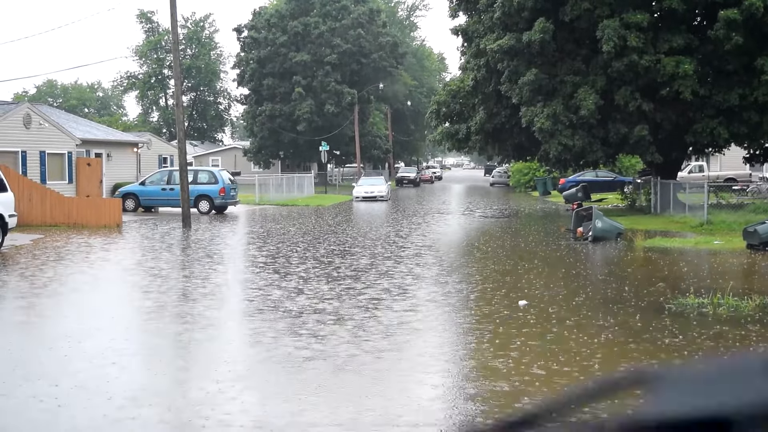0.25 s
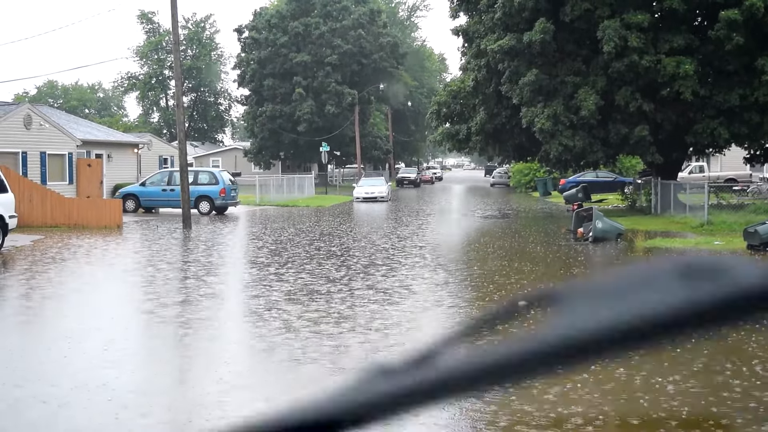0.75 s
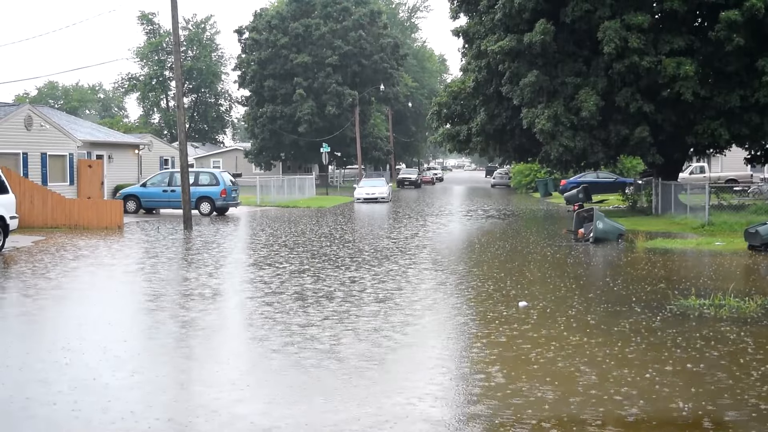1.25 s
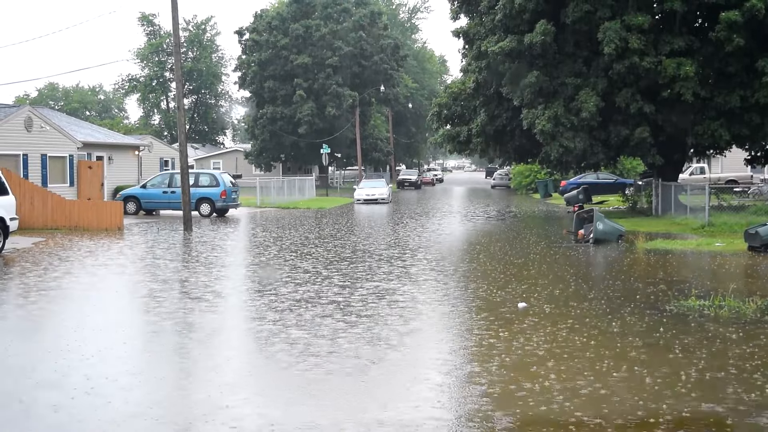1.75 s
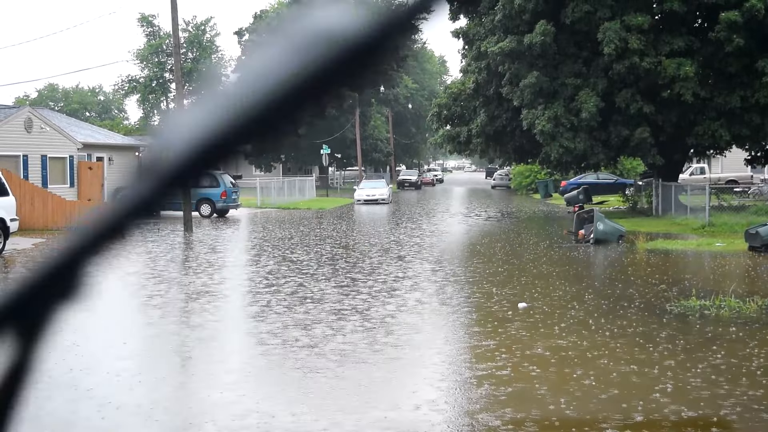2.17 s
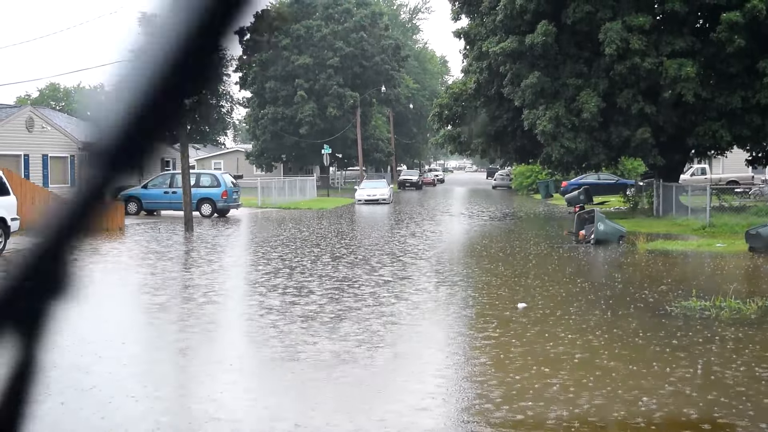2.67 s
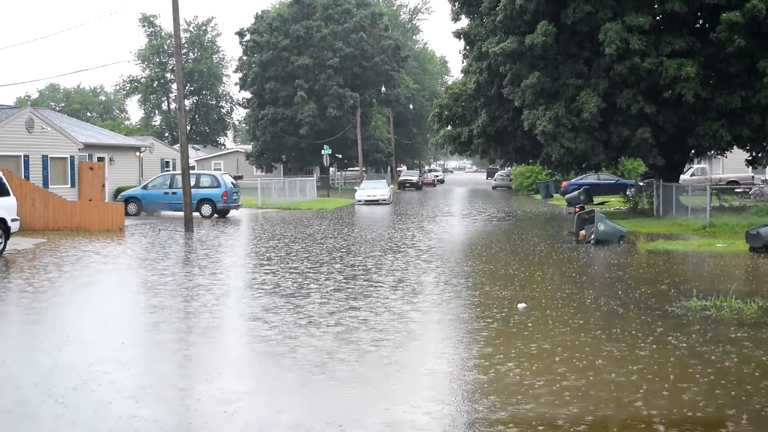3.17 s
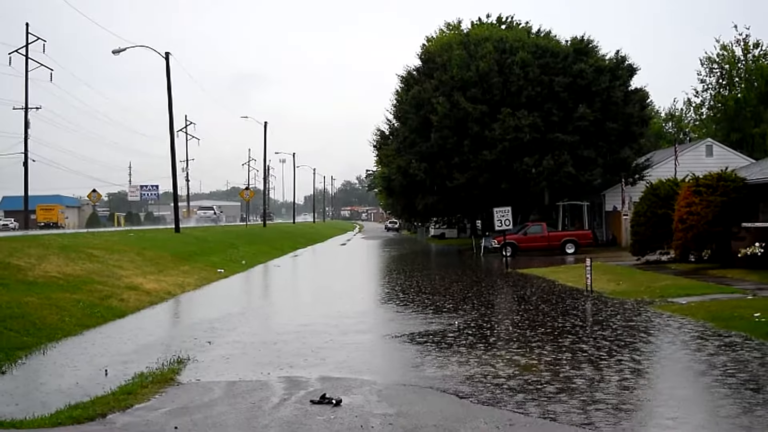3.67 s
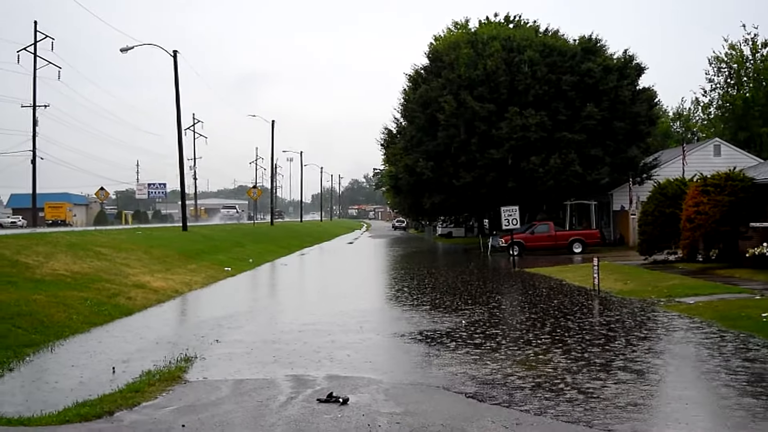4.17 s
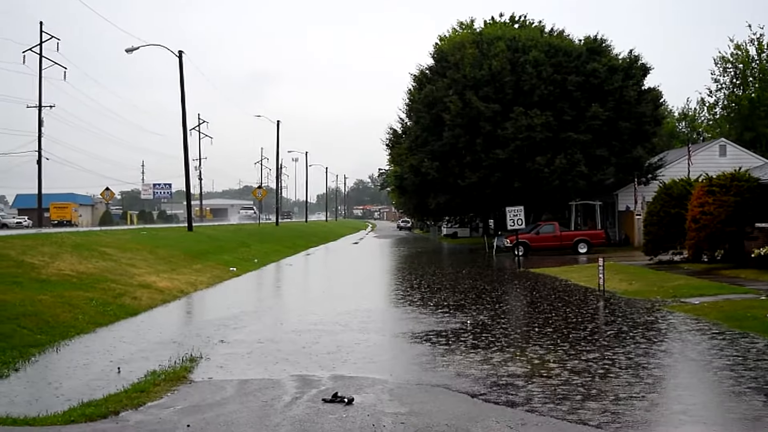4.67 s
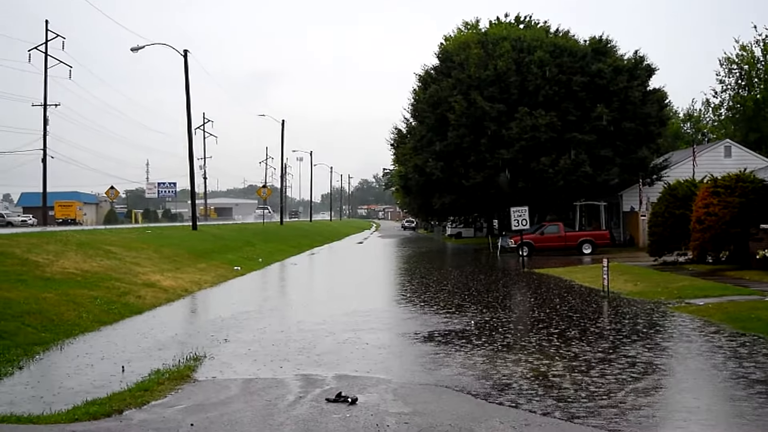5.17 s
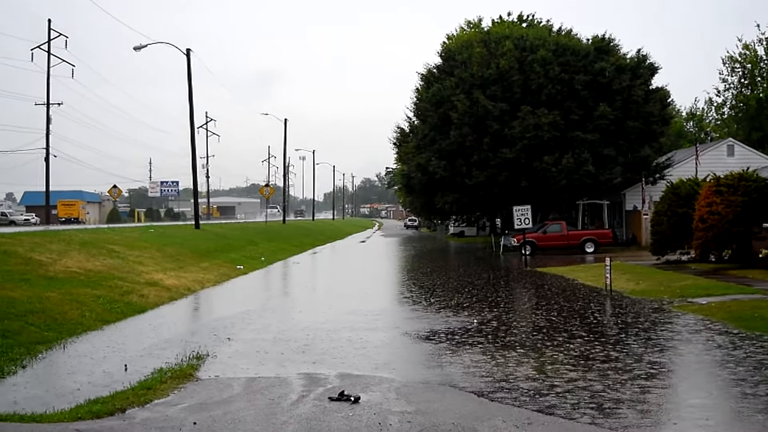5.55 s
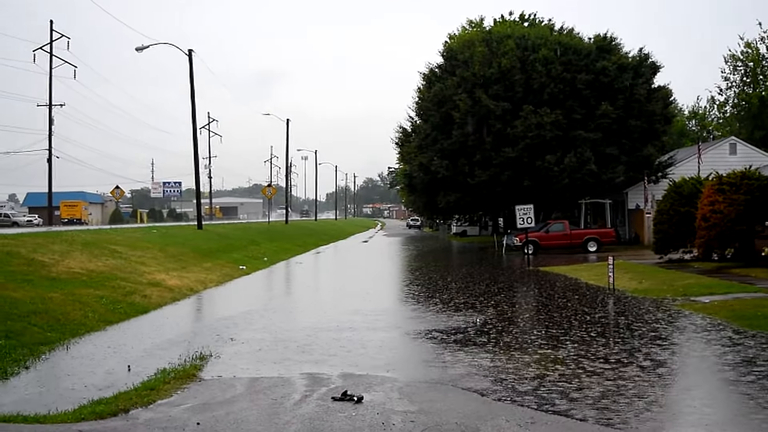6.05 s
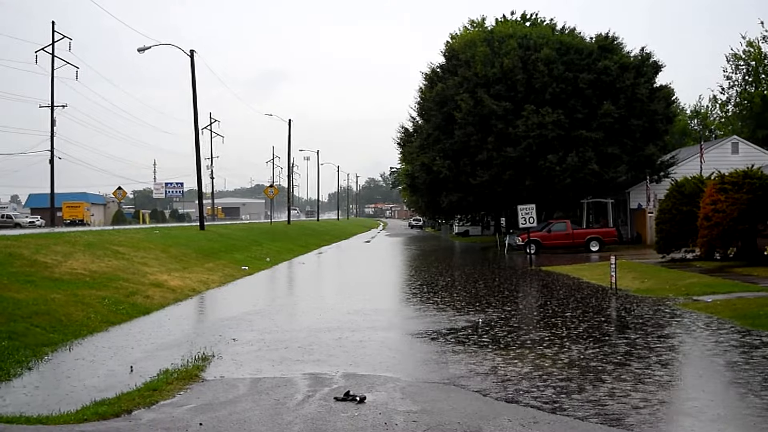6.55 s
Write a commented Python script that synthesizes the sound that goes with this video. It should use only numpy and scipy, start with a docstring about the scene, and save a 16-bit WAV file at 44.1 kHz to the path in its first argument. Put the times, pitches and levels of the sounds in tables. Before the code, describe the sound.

Windshield wipers knock back and forth in a steady rhythm, heard close from inside a car, with a thin motor whine, scattered raindrop ticks and a low idling hum. The sound cuts off for a moment. Then, as if through an open window at the roadside, a truck passes with a louder, uneven engine drone and the hiss of wet tyres. Its note falls and weakens as it slows down.

```python
"""Rain on an idling car, heard from inside: a low hum, drops ringing the roof and glass, and wipers
whose motor whines through each stroke and whose arms thud against the cowl at each turn.
After a short silence the car waits at a wet road, window open. A truck drones past and slows:
its eight cylinders fire unevenly through a resonant tailpipe, and its tyres hiss through the water."""
import sys
import numpy as np
from scipy import signal
from scipy.io import wavfile
from scipy.ndimage import uniform_filter1d

SR = 44100
rng = np.random.default_rng(int(sys.argv[2]) if len(sys.argv) > 2 else 0)


def generate_wav(signal):
    """Clip the signal to [-1, 1] and save it as 16-bit WAV at the path in sys.argv[1]."""
    frames = np.transpose(np.atleast_2d(signal))
    scaled = np.clip(frames, -1, 1) * 32767
    pcm = np.round(scaled).astype(np.int16)
    wavfile.write(sys.argv[1], SR, pcm)


N = 300310
T = np.arange(N) / SR
CABIN_END_S, ROADSIDE_START_S = 3.068, 3.312


def gain(db):
    """Decibels to amplitude."""
    return 10 ** (np.asarray(db) / 20)


def unit_rms(x):
    """Scales to rms 1."""
    return x / np.sqrt(np.mean(x ** 2) + 1e-20)


def curves(rows):
    """One per-sample curve for each column after the time."""
    times, *columns = np.transpose(rows)
    return [np.interp(T, times, column) for column in columns]


def wander(top_hz):
    """Random drift over the decade below top_hz, rms 1."""
    hz, phase = np.geomspace(top_hz / 10, top_hz, 12), rng.random(12)
    coarse = T[::128]
    drift = np.sin(2 * np.pi * (hz * coarse[:, None] + phase)).sum(1)
    return np.interp(T, coarse, unit_rms(drift))


def wash(spectrum, patchy_db, flicker_db, size=1024):
    """Noise shaped by (f/Hz, level/dB) rows, with drifting patches and broadband flicker; rms 1."""
    hop = size // 4
    hz = np.fft.rfftfreq(size, 1 / SR)
    real, imag, patches = rng.standard_normal((N // hop + 5, len(hz), 3)).T
    patches = unit_rms(uniform_filter1d(uniform_filter1d(patches, 10, 0), 10, 1))
    knot_hz, knot_db = np.transpose(spectrum)
    colour_db = np.interp(np.log(hz + 1), np.log(knot_hz + 1), knot_db, left=-99, right=-99)
    flicker = rng.standard_normal(real.shape[1])
    frames = (real + 1j * imag) * gain(colour_db[:, None] + patchy_db * patches + flicker_db * flicker)
    return unit_rms(signal.istft(frames, nperseg=size, noverlap=size - hop)[1][:N])


def strike(times, sizes, response):
    """Sums a scaled copy of the response at each time."""
    train = np.zeros(N)
    np.add.at(train, np.round(np.asarray(times) * SR).astype(int), sizes)
    return signal.oaconvolve(train, response)[:N]


def burst(samples, t60_s, rise_s):
    """Envelope: fast rise, exponential decay."""
    t = T[:samples]
    return gain(-60 * t / t60_s) * (1 - np.exp(-t / rise_s))


def blows(times, level_db, pitch_hz, modes, width_octaves, rise_s):
    """Each blow rings most the modes near its own pitch."""
    t = T[:SR // 3]
    out = np.zeros(N)
    for hz, db, t60_s in modes:
        ring = np.sin(2 * np.pi * hz * t) * gain(-60 * t / t60_s) * (1 - np.exp(-t / rise_s)) ** 2
        nearness = np.exp(-(np.log2(hz / pitch_hz) / width_octaves) ** 2)
        out += strike(times, gain(level_db + db) * nearness, ring)
    return out


def mic_noise():
    """Faint self-noise of the microphone."""
    return gain(-83) * wash([(3000, 3.5), (9000, 1.0), (16000, 0.0)], patchy_db=.3, flicker_db=.3)


# Cabin noise: f/Hz, relative level/dB
CABIN_SPECTRUM = [(18, -24), (28, -12.5), (50, -4), (81, -4), (222, -9.5), (445, -25), (514, -22.5),
                  (756, -27), (1190, -29.5), (2180, -41.5), (2340, -36.5), (2570, -43.5), (3600, -43),
                  (4690, -52), (14200, -54.5), (15600, -55)]
def cabin():
    """Rumble and rain wash inside the car."""
    return gain(-54.5) * wash(CABIN_SPECTRUM, patchy_db=1.0, flicker_db=1.0, size=2048)


# Firing hum: f/Hz, cabin level/dB, roadside level/dB
IDLE_TONES = [(37.86, -54, -58.5), (72.6, -72, -86)]
def idle():
    """Two steady tones of the car's own engine."""
    out = np.zeros(N)
    for hz, cabin_db, roadside_db in IDLE_TONES:
        level_db = np.where(T < CABIN_END_S, cabin_db, roadside_db) + 0.86 * wander(3)
        out += np.sqrt(2) * gain(level_db) * np.sin(2 * np.pi * hz * T)
    return out


# Sharp ticks (large drops, and one loud click at the wiper's turn): t/s, level/dB, f/Hz
SHARP_TICKS = [(.190, -62, 3100), (.243, -70, 3000), (.434, -63, 6800), (0.447, -60, 2700),
               (.779, -66, 3580), (.872, -73, 2870), (.918, -61.5, 3780), (.979, -62, 2820),
               (1.066, -64, 3000), (1.092, -62, 7000), (1.456, -67, 2950), (1.727, -63, 3030),
               (1.779, -71, 3590), (1.8142, -51.5, 3370), (1.837, -71, 2620), (2.001, -73, 3200),
               (2.258, -60.5, 2910), (2.386, -70, 7000), (3.019, -59, 3130)]
# Roof and glass modes: f/Hz, relative level/dB, t60/s
ROOF_MODES = [(1137, 7, 0.016), (2290, -5, 0.017), (2970, -4, 0.022), (3410, -2.5, 0.015),
              (3990, 0.5, 0.017), (5300, 3, .012), (7000, -5.5, 0.011)]
def rain():
    """Sharp ticks over a patter of small drops; each rings the roof and sets off a puff of noise."""
    times, level_db, hz = np.transpose(SHARP_TICKS)
    when, size, pitch = rng.random((700, 3)).T  # small drops
    times = np.r_[times, when * CABIN_END_S]
    level_db = np.r_[level_db, -81 - 2.5 * np.log(1 - size)]
    hz = np.r_[hz, 900 * 4.5 ** pitch]
    taps = blows(times, level_db, hz, ROOF_MODES, width_octaves=0.33, rise_s=0.00066)
    puffs = strike(times, gain(level_db - 4), burst(4000, t60_s=0.045, rise_s=.0006))
    puff_spectrum = [(500, -6.0), (1200, 5.0), (3500, -6.0), (4500, -16.5), (6000, -25)]
    return taps + puffs * wash(puff_spectrum, patchy_db=0.82, flicker_db=0, size=256)


def rough_tone(hz, flutter_db):
    """A thin tone that flutters in level and pitch."""
    cycles = np.cumsum(hz * (1 + 0.0037 * wander(25))) / SR
    return np.sqrt(2) * gain(flutter_db * wander(40)) * np.sin(2 * np.pi * cycles)


def arch_db(progress, peak_at):
    """Flat-topped level that sinks at both ends of a stroke."""
    return -16.5 * np.interp(progress, [0, peak_at, 1], [1, 0, 1]) ** 3.5


SWEEP_S = 1.292  # out and back
# Motor strokes: t in sweep/s, length/s, shaft level/dB, octave level/dB
MOTOR_STROKES = [(.04, .56, -71.5, -74), (0.914, .31, -75, -72.5)]
def wiper_motor(rest_hz=392.3, run_up_hz=41.6):
    """The shaft tone and its octave climb and fall back in each stroke; the octave dips midway."""
    run_up, shaft, octave = np.zeros((3, N))
    for start_s, length_s, shaft_db, octave_db in MOTOR_STROKES:
        progress = (T % SWEEP_S - start_s) / length_s
        running = (progress > 0) & (progress < 1)
        run_up += running * np.sin(np.pi * np.clip(progress, 0, 1) ** 1.5) ** .7
        shaft += running * gain(shaft_db + arch_db(progress, peak_at=0.83))
        dip_db = -16 * np.exp(-((progress - .58) / 0.087) ** 2)
        octave += running * gain(octave_db + dip_db + arch_db(progress, peak_at=.35))
    hz = rest_hz + run_up_hz * run_up
    return shaft * rough_tone(hz, flutter_db=0.67) + octave * rough_tone(2 * hz, flutter_db=2.8)


# Rubber at the top of the glass, bright: f/Hz, relative level/dB
TOP_SCRAPE = [(200, -17), (330, 3.5), (520, -1), (850, -9), (1250, -6), (1700, -20), (2300, -41)]
# At the bottom, dull: f/Hz, relative level/dB
BOTTOM_SCRAPE = [(200, -17), (330, -0.5), (500, 2.5), (800, -8), (1200, -10), (2000, -33)]
def blade_scrape(times, level_db):
    """The rubber scrapes the glass briefly at each knock."""
    envelope = burst(8000, t60_s=0.11, rise_s=0.002)
    at_top = times % SWEEP_S < SWEEP_S * 2 / 3
    out = np.zeros(N)
    for spectrum, chosen in (TOP_SCRAPE, at_top), (BOTTOM_SCRAPE, ~at_top):
        swell = strike(times, chosen * gain(level_db), envelope)
        out += swell * wash(spectrum, patchy_db=3.3, flicker_db=0.94, size=512)
    return out


def linkage_thud(hz):
    """A soft low knock whose pitch sags as the linkage unloads."""
    age = T[:4000] / 0.016  # 1 at the peak
    cycles = np.cumsum(hz * (0.781 + 0.53 * np.exp(-age / 1.43))) / SR
    return (age * np.exp(1 - age)) ** 1.2 * np.sin(2 * np.pi * cycles)


# Knocks at the top turn: t in sweep/s, relative level/dB, f/Hz, relative scrape level/dB
TOP_KNOCKS = [(.447, -10.5, 177, -23), (.458, 0, 129.4, -39.5), (.508, -2.5, 172, -12),
              (.534, -4, 125.4, -28.5), (.558, -2, 126, -25), (.625, -1.5, 129.4, -40)]
# At the bottom turn: same columns
BOTTOM_KNOCKS = [(1.025, -4.5, 141.3, -28.5), (1.097, -11, 196, -37), (1.151, -1, 149.4, -18.5),
                 (1.186, -3.5, 130, -36), (1.244, -14, 124, -42)]
# Sweeps: t/s, top turn level/dB, bottom turn level/dB
SWEEPS = [(0, -37, -31.5), (1.293, -36.5, -31), (2.587, -39.5, -32)]
# Lone mid-stroke knocks: t/s, level/dB, f/Hz, scrape level/dB
STRAY_KNOCKS = [(0.259, -46.5, 113, -59), (2.69, -46, 144, -63), (2.849, -45, 115, -73)]
# Cowl modes: f/Hz, relative level/dB, t60/s
COWL_MODES = [(124, -6.5, 0.28), (155.5, -10.5, 0.059), (220.2, -3, 0.14), (268, -1.5, 0.12),
              (348, -3.5, 0.16), (392, -1.5, 0.073), (511, -9.5, .1), (700, -19.5, 0.065)]
def wipers():
    """At each turn the arms stop, the blades flip and the linkage settles; each knock rings the cowl."""
    knocks = []
    for start_s, top_db, bottom_db in SWEEPS:
        for turn, turn_db in (TOP_KNOCKS, top_db), (BOTTOM_KNOCKS, bottom_db):
            knocks += [(start_s + s, db + turn_db, hz, rub_db + turn_db) for s, db, hz, rub_db in turn]
    knocks = [knock for knock in knocks + STRAY_KNOCKS if knock[0] < CABIN_END_S]
    times, level_db, pitch_hz, scrape_db = np.transpose(knocks)
    cowl = blows(times, level_db - 3, pitch_hz, COWL_MODES, width_octaves=0.97, rise_s=0.0025)
    thuds = sum(strike([s], gain(db - 7), linkage_thud(hz)) for s, db, hz, _ in knocks)
    return cowl + thuds + blade_scrape(times, scrape_db)


# Wet tyre spectra: f/Hz, relative level/dB
HISS_SPECTRUM = [(400, -15), (600, -4), (750, -7.5), (1220, 0), (1900, -2), (2500, -3), (3300, -8),
                 (4400, -15.5), (5200, -19), (6800, -49)]
SIZZLE_SPECTRUM = [(2200, -35), (2700, -8), (3280, -1.5), (3700, -6.5), (4300, -15)]
SPRAY_SPECTRUM = [(3500, -28), (4600, -11.5), (5300, -9.5), (6800, -14), (12000, -30.5), (15600, -50)]
RUMBLE_SPECTRUM = [(20, -14), (50, 4), (100, -1), (160, 3.5), (300, -8), (420, -4.5), (500, -12.5),
                   (800, -18.5), (1200, -44)]
# Tyre noise envelopes: t/s, level/dB
SIZZLE_ENVELOPE = [(3.35, -61), (4.15, -56.5), (4.7, -58.5), (5.2, -56), (5.6, -57), (5.9, -60.5),
                   (6.3, -60), (6.81, -63.5)]
RUMBLE_ENVELOPE = [(3.36, -52), (3.8, -53.5), (4.2, -51), (4.85, -54), (5.9, -54), (6.5, -51.5),
                   (6.81, -51)]
def tyres(nearest_s=4.26, half_pass_s=0.79):
    """Tyres on the wet road; hiss and spray follow a share of the inverse-square loss."""
    loss_db = 10 * np.log10(1 + ((T - nearest_s) / half_pass_s) ** 2)
    hiss = gain(-54.5 - 0.25 * loss_db) * wash(HISS_SPECTRUM, 0.76, 0.27, size=512)
    sizzle = gain(*curves(SIZZLE_ENVELOPE)) * wash(SIZZLE_SPECTRUM, 0.96, 0.54, size=512)
    spray = gain(-72.5 - 0.57 * loss_db) * wash(SPRAY_SPECTRUM, 0.95, 0.78, size=512)
    rumble = gain(*curves(RUMBLE_ENVELOPE)) * wash(RUMBLE_SPECTRUM, 1.6, 0.2, size=2048)
    fade_in_db = -5.5 * np.clip(1 - (T - ROADSIDE_START_S) / 0.034, 0, 1)
    return gain(fade_in_db) * (hiss + sizzle + spray + rumble)


# Engine speed: t/s, firing rate/Hz
FIRING_RATE = [(3.32, 115.5), (3.5, 117.3), (3.75, 119.5), (3.9, 119.2), (4.07, 116.8), (4.35, 119.7),
               (4.6, 117.3), (4.85, 117), (5.1, 118.7), (5.25, 112.4), (5.4, 100.2), (5.55, 93.3),
               (5.7, 91.7), (5.9, 98), (6.03, 98.8), (6.3, 90.9), (6.6, 82), (6.81, 82.3)]
# Order groups: t/s, firing tone level/dB, middle level/dB, upper level/dB
GROUP_LEVELS = [(3.32, -47, -50.5, -57), (3.65, -42.5, -46.5, -51.5), (3.88, -46, -47.5, -52),
                (4.08, -45, -50, -58.5), (4.35, -44.3, -48.5, -54.5), (4.65, -44.5, -46.8, -60.5),
                (5.1, -47, -47.7, -60.5), (5.3, -51, -55.5, -63.5), (5.55, -50.5, -52, -66),
                (6.0, -50.5, -50.3, -57.5), (6.3, -49.5, -55.5, -62), (6.45, -61.5, -56, -63.5),
                (6.81, -66, -59.5, -67.5)]
# Exhaust: order of the two-turn cycle, level in group when fast/dB, when slow/dB
EXHAUST_ORDERS = [(8, -1, 0), (10, -24, -14), (11, -13, -24), (13, -8, -10), (14, -15, -17), (16, -13, -14),
                  (17, -18, -17), (19, -7, -16), (21, -15, -8), (22, -14, -17), (24, -9, -14),
                  (27, -5.5, -9), (29, -3, -1), (30, -4, -10), (32, -9, -12), (33, -14, -14), (34, -12, -7),
                  (36, -17, -20), (37, -19, -10)]
def truck_engine(pipe_hz=161, pipe_half_width_hz=15, pipe_db=10.5):
    """Two banks fire unevenly, adding orders beside the firing tone; tailpipe resonance lifts them."""
    (firing_hz,), group_db = curves(FIRING_RATE), curves(GROUP_LEVELS)
    cycle_hz = firing_hz / 8
    cycle_phase = 2 * np.pi * np.cumsum(cycle_hz) / SR + 0.0054 * wander(11)  # firing jitter
    fast = np.interp(firing_hz, [98, 114], [0, 1])
    out = np.zeros(N)
    for order, fast_db, slow_db in EXHAUST_ORDERS:
        group = (order > 9) + (order > 23)
        level_db = group_db[group] + fast * fast_db + (1 - fast) * slow_db + 1.7 * wander(9)
        level_db += pipe_db / (1 + ((order * cycle_hz - pipe_hz) / pipe_half_width_hz) ** 2)
        lag_rad = 1.8 * (order % 8 == 5)  # the far bank arrives later
        out -= np.sqrt(2) * gain(level_db) * np.cos(order * cycle_phase - lag_rad + .3 * wander(7))
    return out


def scene():
    """Cabin, silence, roadside; the car idles in both scenes."""
    hum = idle()
    inside = hum + cabin() + rain() + wipers() + wiper_motor()
    roadside = hum + truck_engine() + tyres() + mic_noise()
    inside_gate = np.clip((CABIN_END_S - T) / .0006, 0, 1)
    return (inside_gate * inside + (T > ROADSIDE_START_S) * roadside)[None]


def record(dry, low_hz=2.6, high_hz=15750):
    """A coupling capacitor, then the band limit."""
    coupling = signal.butter(1, low_hz, "high", fs=SR, output="sos")
    band_limit = signal.firwin(511, high_hz, window=("kaiser", 9), fs=SR)
    return signal.oaconvolve(signal.sosfilt(coupling, dry), band_limit[None], "same")


dry = scene()
out = record(dry)
generate_wav(out)
```